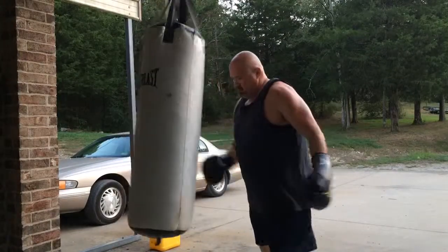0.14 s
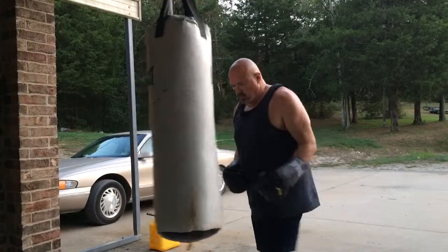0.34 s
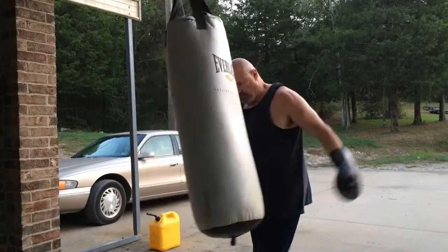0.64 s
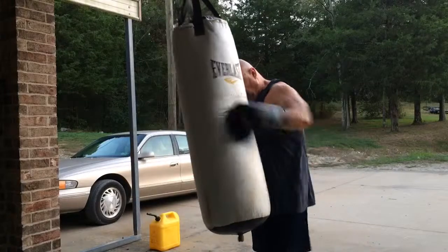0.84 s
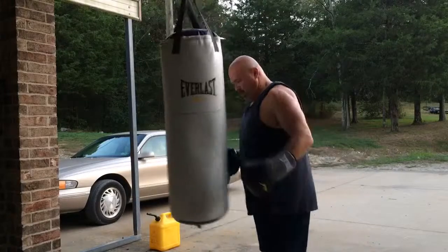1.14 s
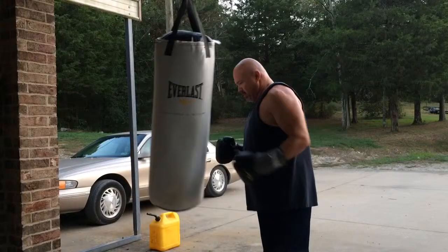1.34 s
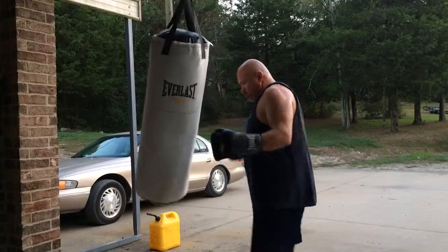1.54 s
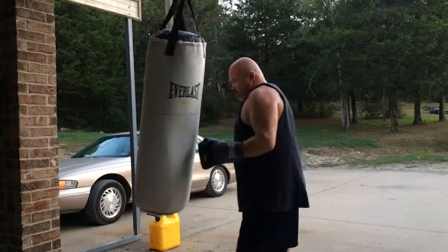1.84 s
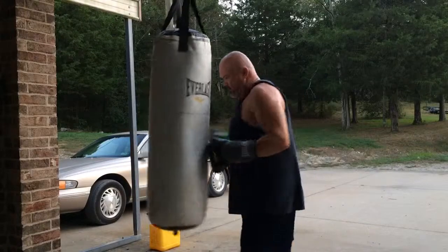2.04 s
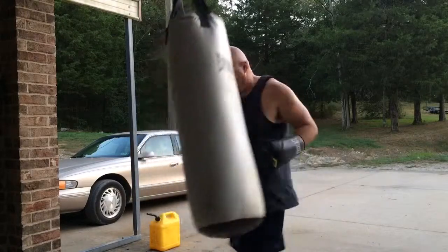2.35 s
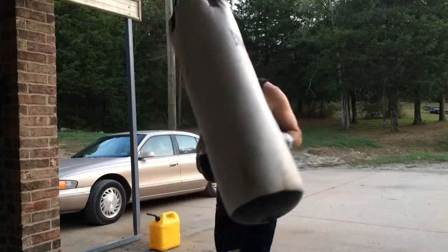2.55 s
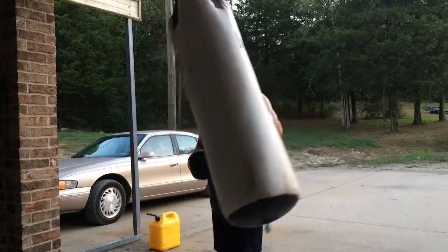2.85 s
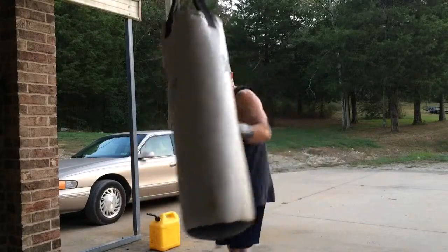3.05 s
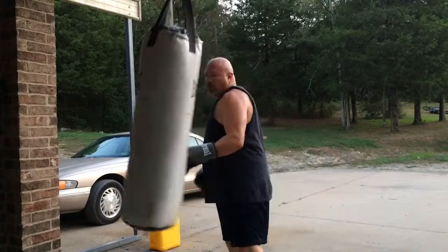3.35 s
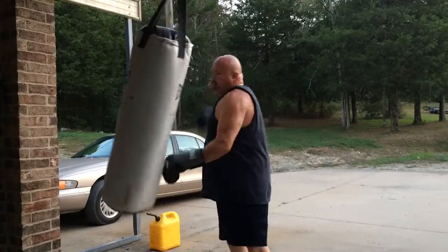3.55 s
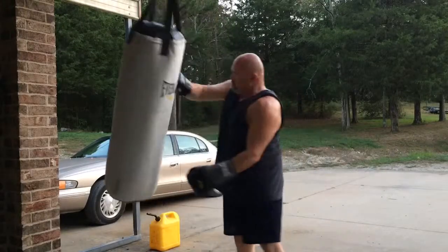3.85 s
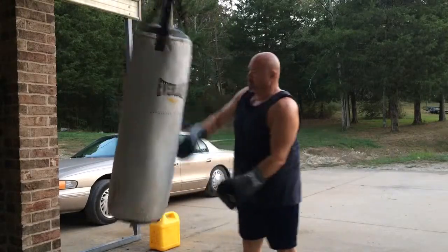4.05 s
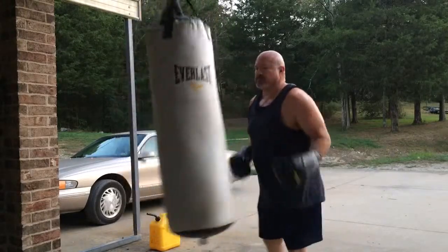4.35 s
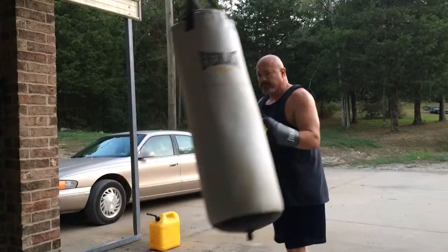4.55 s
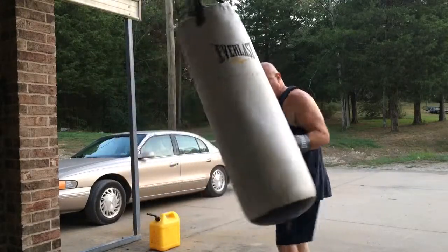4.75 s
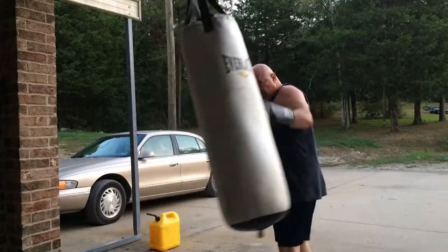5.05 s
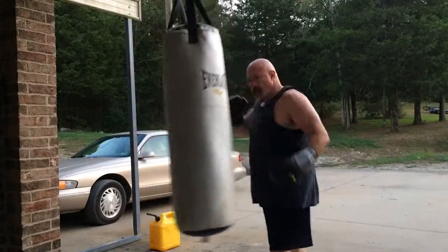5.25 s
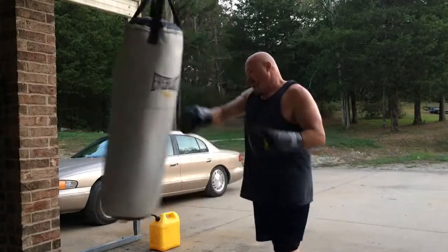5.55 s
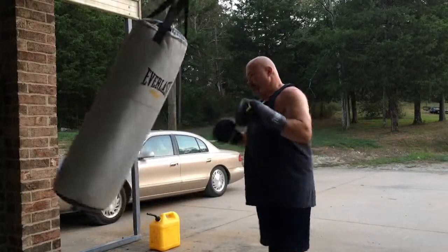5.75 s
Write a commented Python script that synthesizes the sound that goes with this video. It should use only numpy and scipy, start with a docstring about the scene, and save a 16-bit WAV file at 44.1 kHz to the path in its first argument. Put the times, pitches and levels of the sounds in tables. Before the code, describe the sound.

Gloved punches thud into a hanging heavy bag while its chain rattles and rings and the supporting beam creaks outdoors.

```python
"""Gloved punches land on a heavy bag that hangs by a chain from a carport beam, open to a quiet yard.
Each punch squeezes out air, slaps the cover and thuds. The bag jumps, so its chain rattles, snaps taut
and rings. The beam booms and groans under the load, and the hook knocks and creaks as the bag swings.
Behind it all, the boxer's clothes rustle and a shoe scuffs the concrete once."""
import sys
import numpy as np
from scipy import signal
from scipy.io import wavfile
from scipy.ndimage import uniform_filter1d

SR = 44100
rng = np.random.default_rng(int(sys.argv[2]) if len(sys.argv) > 2 else 0)


def int16_out(signal):
    """Quantize to a 16-bit WAV file."""
    q = np.round(np.clip(np.atleast_2d(signal).T, -1, 1) * 32767)
    wavfile.write(sys.argv[1], SR, q.astype(np.int16))


N = 259749
TIME = np.arange(N) / SR
AGE = np.arange(SR // 2) / SR  # seconds since a hit

# Punches and light nudges on the bag:
# t/s, thud/dB, slap/dB, deep push/dB, thud f/Hz, crackle/dB, crackle delay/s, glove pop/dB, sway/dB
BLOWS = [(0.0143, -12.5, -4.5, -50, 216, -11.5, 0.0055, -23.5, -44.5),
         (0.9360, -12.5, -9.5, -24.5, 219, -17.5, 0.0059, -27.5, -54.5),
         (2.274, -9, -11.5, -15.5, 215, -17, 0.0059, -15.5, -45.5),
         (3.202, -37.5, -36, -58, 122.6, -41.5, 0.0041, -40.5, -56.5),
         (3.8809, -11.5, -18, -23, 267, -16, 0.0013, -46, -43),
         (5.073, -23.5, -36, -45, 181, -34, 0.00059, -34, -46),
         (5.4648, -11.5, -38, -32, 232, -19.5, 0.0063, -31, -41)]
# Chain links snapping taut: t/s, clank/dB, ring/dB, clank f/Hz, favoured ring f/Hz
LINK_SNAPS = [(0.1129, -23, -22.5, 1190, 12350), (0.197, -20.5, -34, 1360, 13800),
              (0.2758, -33.5, -24, 1380, 13000), (0.4635, -32.5, -40.5, 1310, 13900),
              (0.9959, -26, -44.5, 1030, 12200), (1.0976, -28.5, -39, 1430, 12900),
              (1.2064, -35, -48, 1480, 12550), (2.3532, -26, -43, 1340, 13100),
              (2.6095, -44, -47, 1130, 13800), (2.7928, -32, -66, 1160, 13200),
              (3.4497, -21, -61, 1230, 13100), (3.9126, -14.5, -28.5, 1350, 13800),
              (3.9526, -14, -23, 1390, 13700), (3.9628, -12.5, -27, 1400, 12500),
              (4.076, -24.5, -36.5, 1200, 13800), (4.135, -24, -35, 1270, 13200),
              (4.18, -27, -35.5, 1338, 12600), (4.319, -30.5, -62, 1470, 12600),
              (4.376, -22, -53, 1320, 13100), (4.442, -20.5, -32, 1330, 13200),
              (4.6063, -17, -25, 1190, 14200), (4.735, -20, -38.5, 1130, 13800),
              (5.187, -28, -44.5, 1360, 13400), (5.2804, -42, -49, 1430, 13100),
              (5.543, -13, -21.5, 1380, 13100), (5.573, -19.5, -25.5, 1400, 13900),
              (5.696, -23.5, -21, 1230, 13600), (5.7475, -19.5, -24, 1350, 13300),
              (5.7604, -30, -24.5, 1370, 13100)]

# Short events: t/s, level/dB, f/Hz
HOOK_KNOCKS = [(0.151, -23, 1350), (0.25, -29, 1360), (0.425, -28.5, 1260), (0.7335, -37.5, 1340),
               (0.773, -40, 1150), (0.9002, -36.5, 1070), (1.1346, -30, 1203), (1.2862, -32, 1390),
               (1.6268, -32.5, 1280), (1.6714, -27.5, 1250), (1.922, -27, 1320), (1.9871, -27.5, 1160),
               (2.0153, -31.5, 1030), (2.051, -30, 1310), (2.5763, -27.5, 1220), (2.663, -34.5, 1235),
               (2.851, -39.5, 1190), (3.1493, -37.5, 1210), (3.3138, -37, 1120), (3.3825, -26.5, 1260),
               (3.563, -32, 1410), (4.8499, -33, 1340), (5.408, -31, 1330)]  # the hook slips in its eye
BEAM_JOLTS = [(0.965, -28, 251.4), (2.349, -32.5, 196), (2.79, -38.5, 208), (3.451, -26.5, 238),
              (3.949, -31.5, 188), (4.611, -27, 203.5), (4.754, -25.5, 198.6), (5.09, -34.5, 163.6),
              (5.530, -29.5, 215.5), (5.608, -31.5, 188.5), (5.745, -33.5, 205)]  # the bag's weight jolts the beam
RING_PINGS = [(2.432, -44.5, 6900), (4.844, -41, 6640), (5.117, -44, 6880), (5.184, -40, 6520)]  # a loose ring touches the hanger

# Sounds that swell and fade: middle t/s, half length/s, level/dB
RUSTLES = [(0.57, 0.16, -55), (1.4, 0.41, -62.5), (2.55, 0.45, -71), (2.95, 0.25, -62), (3.33, 0.047, -56),
           (3.65, 0.099, -52), (4.55, 0.32, -51), (5.36, 0.13, -76)]  # clothes and gloves brush the bag
BEAM_GROANS = [(0.6, 0.43, -46), (1.328, 0.068, -40), (2.01, 0.1, -45), (2.95, 0.11, -52.5),
               (3.17, 0.06, -49.5), (3.478, 0.064, -36.5), (3.69, 0.014, -42), (4.223, 0.055, -33.5),
               (4.447, 0.059, -36), (4.75, 0.2, -42), (5.767, 0.071, -37)]  # the beam groans at the ends of a swing
BAG_TOSSES = [(0.19, 0.082, -40), (4.02, 0.078, -41), (4.435, 0.048, -34), (4.68, 0.16, -48),
              (5.6, 0.082, -37), (5.775, 0.03, -39)]  # the bag is tossed up and its chain goes slack

# A mode is one tone of a struck object; t60 is the time it takes to fade by 60 dB.
# Modes of the hook and its mounting plate: f/Hz, level/dB, t60/s
MOUNT_MODES = [(203, -16.5, 0.065), (334.5, -16.5, 0.093), (447, -16, 0.014), (974, -7.5, 0.03),
               (1183, -0.5, 0.012), (1384, 0, 0.017), (1723, -10.5, 0.021), (1782, -2.5, 0.011)]
# Modes of the beam: pitch ratio, level/dB, t60/s
BEAM_MODES = [(.22, -8, 0.15), (.68, 5, 0.055), (1, 8.5, 0.084), (1.2, -30, 0.054), (1.6, -10, 0.14)]
# Modes of the steel links, joined from two tables
LINK_HZ = [12500, 12570, 13060, 13095, 13680, 13835, 14250, 14850, 6900]  # f/Hz
LINK_RINGING = [(-2, 0.33), (5.5, 0.2), (-24, .22), (4.5, 0.26), (-20.5, 0.47), (0, 0.19), (-18, .06),
                (-29, 0.064), (-34, 0.11)]  # level/dB, t60/s
LINK_MODES = np.column_stack([LINK_HZ, LINK_RINGING])

# Tone colours, or how strong a noise is from low to high: f/Hz, level/dB
YARD_TONE = [(20, -14), (60, -16.5), (110, 10), (280, -8), (600, -3.5), (1200, -15), (2500, -45),
             (4500, -11), (6000, -23), (11500, -22), (14700, -10), (16000, -10)]  # outdoor air
CLOTH_TONE = [(300, -20), (1200, -10), (2600, 0), (4500, -4.5), (7000, -8.5), (11000, -9), (15000, -25)]  # rubbing cloth and leather
GRIT_TONE = [(300, -36), (1200, -16), (2100, -10), (4200, -16), (7000, -23), (15000, -40)]  # a sole on concrete
GROAN_TONE = [(100, -18.5), (200, -24), (310, 6), (420, 0), (600, -14), (1000, -9), (2000, -24),
              (4000, -56)]  # the groaning beam
RUMBLE_TONE = [(20, -8), (45, -8), (85, -0.5), (140, -3.5), (200, 2.5), (340, -6.5), (480, -14.5),
               (750, -26.5), (2000, -31.5)]  # the rumbling beam
CREAK_TONE = [(150, -17), (450, -2.5), (680, -15), (1000, -2), (1380, 4), (1600, -3.5), (1850, -2.5),
              (2400, -12.5), (4500, -14.5), (9000, -22), (15000, -40)]  # the grinding hook
TICK_TONE = [(200, -35), (600, -52), (1700, -5), (2600, -9.5), (4500, -10), (8000, -14.5), (15000, -18)]  # link hitting link
COVER_TONE = [(100, -2.5), (400, -7.5), (650, -6.5), (1000, -2), (2000, -8), (4000, -11), (8000, -16.5),
              (15000, -26.5)]  # the crackling vinyl cover

# How long the carport echoes: f/Hz, t60/s
ECHO_TIMES = [(60, 0.51), (200, 0.25), (600, 0.38), (1400, 0.23), (4000, 0.37), (9000, 0.15), (15000, 0.16)]


def amp(db):
    """Turns decibels into a gain to multiply by."""
    return 10 ** (np.asarray(db) / 20)


def unit(x):
    """Scales a signal to an average (rms) level of 1."""
    return x / np.sqrt(np.mean(x ** 2) + 1e-20)


def read(points, hz):
    """Looks up a value between a table's rows, on a log-frequency axis."""
    f, value = np.transpose(points)
    return np.interp(np.log(hz + 1), np.log(f), value)


def add(mix, s, sound):
    """Mixes a sound in, starting at s seconds."""
    start = round(s * SR)
    sound = sound[max(-start, 0):]
    part = mix[max(start, 0):][:len(sound)]
    part += sound[:len(part)]


def colour(x, points, size=4096):
    """Gives a sound a tone colour, using a filter of energy 1 that never rings ahead of a hit."""
    log_gain = np.log(amp(read(points, abs(np.fft.fftfreq(size, 1 / SR)))))
    taps = np.fft.ifft(np.exp(np.conj(signal.hilbert(log_gain)))).real[:size // 2]
    return signal.oaconvolve(x, taps / np.linalg.norm(taps))[:len(x)]


def grains(length, per_s, spread_db):
    """Random clicks of uneven size, at an average level of 1."""
    size = amp(spread_db * np.minimum(rng.exponential(1, length), 3))
    return unit(size * rng.standard_normal(length) * (rng.random(length) < per_s / SR))


def swells(rows):
    """A gain that rises and falls smoothly, once for each row."""
    return sum(amp(db) * np.exp(-((TIME - s) / half_s) ** 2) for s, half_s, db in rows)


def sway(settle_db_per_s=13):
    """How hard the bag works its hanger: each blow sets it going, then it settles."""
    energy = sum(amp(db - settle_db_per_s * abs(TIME - s)) ** 2 * (TIME >= s) for s, *_, db in BLOWS)
    return np.sqrt(energy)


def ring(modes, scale=1, uneven_db=0, detune=0):
    """The fading tones of a struck object; each hit shares its energy among them a little differently."""
    hz, db, t60 = np.transpose(modes)[:, :, None]
    t = AGE[AGE < t60.max()]
    share, shift = rng.standard_normal((2, len(modes), 1))
    sign = np.cos(np.pi * np.arange(len(modes)))[:, None]  # neighbouring modes move opposite ways
    waves = sign * np.sin(2 * np.pi * hz * scale * (1 + detune * shift) * t)
    return (amp(db + uneven_db * share) * np.exp(-np.log(1000) * t / t60) * waves).sum(0)


def favour(modes, lead_hz, reach_hz, shade_db):
    """The spot that is hit drives the modes near one pitch more than the others."""
    hz, db, t60 = np.transpose(modes)
    nearness = np.exp(-((hz - lead_hz) / reach_hz) ** 2)
    return np.transpose([hz, db + shade_db * (nearness - 1), t60])


def chatter(sound, rest_db, swell_s, size=3000):
    """A strike is followed by a flurry of tiny touches that swells and fades."""
    progress = AGE[:size] / swell_s
    contact = amp(rest_db) * grains(size, 3000, 0.54) * progress * np.exp(1 - progress)
    contact[0] += 1  # the strike itself
    out = signal.fftconvolve(contact, sound)
    return out * np.linalg.norm(sound) / np.linalg.norm(out)


def carport(x, wet_db, size=SR // 2, spacing=16):
    """Adds echoes from the roof, brick wall and floor; each pitch range fades at its own speed."""
    echoes = np.zeros(size)
    slots = np.arange(SR // 200, size - spacing, spacing)
    echoes[slots + rng.integers(0, spacing, len(slots))] = rng.choice([-1., 1.], len(slots))
    hz, t, bands = signal.stft(echoes, SR, nperseg=256)
    tail = signal.istft(bands * np.exp(-np.log(1000) * t / read(ECHO_TIMES, hz)[:, None]), SR)[1]
    return x + amp(wet_db) * signal.oaconvolve(x, tail / np.linalg.norm(tail))[:N]


def yard(db=-59):
    """Faint outdoor air with a thin, high hiss."""
    return amp(db) * colour(rng.standard_normal(N), YARD_TONE)


def rustle():
    """Cloth and leather rub softly as the boxer moves around the bag."""
    return swells(RUSTLES) * colour(grains(N, 12000, 2.1), CLOTH_TONE)


def shoe(start_s=1.866, db=-37.5, rise_s=0.012, fade_s=0.033):
    """A sole lands and drags briefly over gritty concrete."""
    t = np.maximum(TIME - start_s, 0)
    level = np.minimum(t / rise_s, 1) * np.exp(-t / fade_s)
    return amp(db) * level * colour(grains(N, 10000, 1.7), GRIT_TONE)


def beam(swell_s=0.0067, sway_db=-2, toss_db=-9, rest_db=-59, heave_db=-12, heave_hz=75, heave_s=0.02):
    """The beam booms and heaves at each jolt, and groans and rumbles under the swinging weight."""
    booms = np.zeros(N)
    for s, db, hz in BEAM_JOLTS:
        boom = ring(BEAM_MODES, hz, uneven_db=1.0, detune=0.014)
        t = AGE[:len(boom)]
        heave = amp(heave_db) * np.sin(2 * np.pi * heave_hz * t) * np.exp(-t / heave_s)
        add(booms, s, amp(db) * (boom + heave) * (1 - np.exp(-t / swell_s)))
    groan = colour(swells(BEAM_GROANS) * grains(N, 900, 1), GROAN_TONE)
    load = amp(rest_db) + amp(sway_db) * sway() + amp(toss_db) * swells(BAG_TOSSES)
    rumble = colour(load * rng.standard_normal(N), RUMBLE_TONE)
    return carport(booms, wet_db=0) + groan + rumble


def clank(hz, rasp_s):
    """Metal strikes the mount and scrapes against it for a moment."""
    modes = favour(MOUNT_MODES, hz, reach_hz=300, shade_db=4)
    sound = chatter(ring(modes, uneven_db=2.5, detune=0.018), rest_db=-17.5, swell_s=rasp_s)
    return sound / np.linalg.norm(sound) * np.sqrt(SR / 100)  # as much energy as 10 ms at level 1


def hook(knock_db=-7, creak_db=-4, toss_db=-1, slip_db=-7, slip_hz=1290, slips_per_s=45,
         stutter_db=-7, stutter_s=0.013, stutters=2):
    """The hook knocks, then stutters in weaker slips; it grinds more as the bag sways or is tossed."""
    out, load = np.zeros(N), sway()
    for s, db, hz in HOOK_KNOCKS:
        add(out, s, amp(db + knock_db) * clank(hz, rasp_s=0.0025))
        lags = np.cumsum(stutter_s * (.5 + rng.random(stutters)))
        for k, lag in enumerate(lags, 1):
            add(out, s + lag, amp(db + knock_db + k * stutter_db) * clank(slip_hz, rasp_s=0.0019))
    slip = clank(slip_hz, rasp_s=0.0035)
    small_slips = load * grains(N, slips_per_s, 0.37)
    out += amp(slip_db) * signal.oaconvolve(small_slips, slip / np.linalg.norm(slip))[:N]
    friction = grains(N, 400, 0.65) + 0.96 * rng.standard_normal(N)
    creak = unit(colour(friction, CREAK_TONE))
    out += (amp(creak_db) * load + amp(toss_db) * swells(BAG_TOSSES)) * creak
    return carport(out, wet_db=-8)


def link_ring(modes):
    """Steel links ring after one contact; the first 10 ms are at level 1."""
    sound = chatter(ring(modes, uneven_db=5, detune=0.0019), rest_db=-21.5, swell_s=0.0023)
    return sound / np.std(sound[:SR // 100])


def chain_rattle(per_s=90, tick_db=-3, ring_db=0, tick_s=0.0026, links=3):
    """While the chain is slack, a few links jostle at random, each ticking and ringing in its own way."""
    slack, out = swells(BAG_TOSSES), np.zeros(N)
    for _ in range(links):
        tick = colour(grains(len(AGE), 9000, 2.9) * np.exp(-AGE / tick_s), TICK_TONE)
        jingle = link_ring(LINK_MODES)
        touches = slack * grains(N, per_s, 0.68) / np.sqrt(links)
        for sound, db in (tick, tick_db), (jingle, ring_db):
            out += amp(db) * signal.oaconvolve(touches, sound / np.linalg.norm(sound))[:N]
    return carport(out, wet_db=-16)


def chain_snaps(clank_db=-8, tick_db=-14, ring_db=-1, free_ring_db=-13, tick_s=0.0098,
                rub=0.24, ping_s=0.0067):
    """Links snap taut with a gritty tick, a clank and a very high ring; a loose ring adds light pings."""
    hits, rings = np.zeros((2, N))
    t = AGE[:SR // 8]
    for s, db, steel_db, hz, lead_hz in LINK_SNAPS:
        click_db = tick_db + 0.57 * db + 0.16 * steel_db  # a harder snap ticks louder
        add(hits, s, amp(click_db) * colour(grains(len(t), 9000, 4.0) * np.exp(-t / tick_s), TICK_TONE))
        add(hits, s, amp(db + clank_db) * clank(hz, rasp_s=0.0028))
        modes = favour(LINK_MODES, lead_hz, reach_hz=400, shade_db=11.5)
        # a lighter snap leaves the link pinched, so it rings for less time
        shorten = amp(0.071 * min(steel_db - free_ring_db, 0))
        add(rings, s, amp(steel_db + ring_db) * link_ring(modes * [1, 1, shorten]))
    # links rub on each other while they ring, which roughens the tone
    roughness = unit(uniform_filter1d(rng.standard_normal(N), size=150))
    rings *= np.exp(rub * (roughness - rub))
    for s, db, hz in RING_PINGS:
        add(rings, s, amp(db) * np.sin(2 * np.pi * hz * t) * np.exp(-t / ping_s))
    return carport(hits, wet_db=-2.5) + carport(rings, wet_db=-15)


def punches(squeeze_s=0.0013, slap_s=0.00008, thud_s=0.0064, push_hz=58, push_s=0.0077, crackle_s=0.0043,
            shudder_db=-11, shudder_s=0.051, sag_db=-13, sag_s=0.014, pop_hz=430, pop_s=0.0028):
    """Air pressure dips as the glove closes in and snaps at contact; then glove and filling bounce."""
    lead_s = 0.01  # the sound starts just before the glove lands
    t = AGE - lead_s
    after, landed = np.maximum(t, 0), t >= 0
    body, deep, cover, slap = np.zeros((4, N))
    for s, thud_db, slap_db, push_db, hz, crackle_db, delay_s, pop_db, _ in BLOWS:
        start = s - lead_s
        squeeze = -.5 * np.exp(np.minimum(t, 0) / squeeze_s) * ~landed
        thud = -np.cos(2 * np.pi * hz * after + np.pi / 4) * np.exp(-after / thud_s) * landed
        # the filling also has a slower bounce
        sag = amp(sag_db) * np.sin(2 * np.pi * hz * 0.708 * after) * np.exp(-after / sag_s)
        # air cupped under the glove pops
        pop = amp(pop_db) * np.sin(2 * np.pi * pop_hz * after) * np.exp(-after / pop_s)
        add(body, start, amp(thud_db) * (squeeze + thud + sag) - pop)
        add(slap, start, -amp(slap_db) * np.exp(-abs(t) / slap_s))
        # the whole bag is shoved aside
        shove = after / push_s * np.exp(1 - after / push_s)
        add(deep, start, amp(push_db) * np.sin(2 * np.pi * push_hz * after) * shove)
        # the vinyl cover buckles in a burst of tiny snaps, then shudders out
        buckle = np.exp(-np.maximum(t - delay_s, 0) / crackle_s) * (t >= delay_s)
        shudder = amp(shudder_db) * np.exp(-after / shudder_s) * landed
        crackle = grains(len(t), 4000, 5.3) * buckle + grains(len(t), 14000, 2.5) * shudder
        add(cover, start, amp(crackle_db) * colour(crackle, COVER_TONE))
    return carport(body, wet_db=-2.5) + carport(deep, wet_db=-26) + carport(cover + slap, wet_db=-12)


def scene():
    """Adds all the sources together in one channel."""
    mix = punches() + chain_snaps() + chain_rattle() + hook() + beam() + shoe() + rustle() + yard()
    return mix[None]


def record(dry):
    """A small microphone loses the deepest bass and highest treble, and rounds off the tallest peaks."""
    low_hz, high_hz, ceiling = 32, 15750, 0.75
    thin = signal.sosfilt(signal.butter(3, low_hz, "high", fs=SR, output="sos"), dry)
    rounded = thin / (1 + (thin / ceiling) ** 6) ** (1 / 6)
    treble_cut = signal.firwin(255, high_hz, window=("kaiser", 8), fs=SR)
    return signal.oaconvolve(rounded, treble_cut[None], "same")


dry = scene()
out = record(dry)
int16_out(out)
```